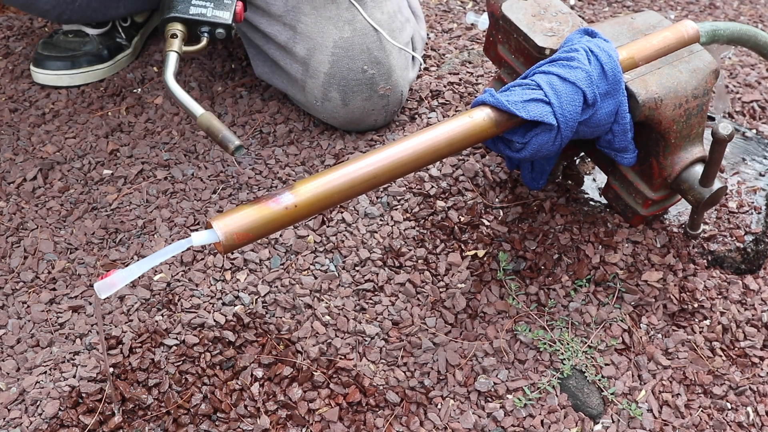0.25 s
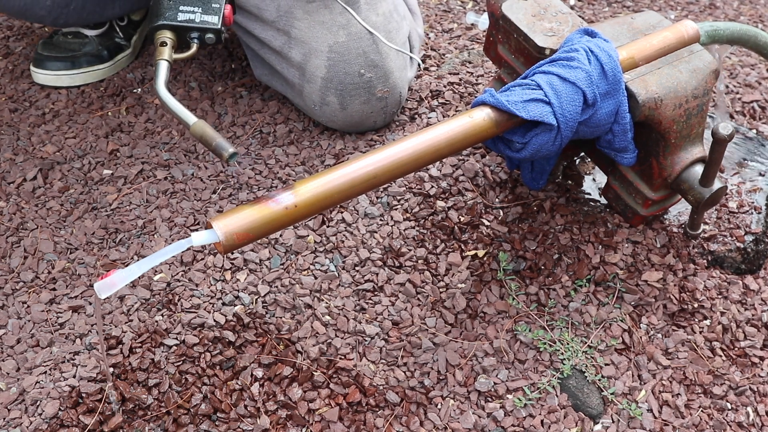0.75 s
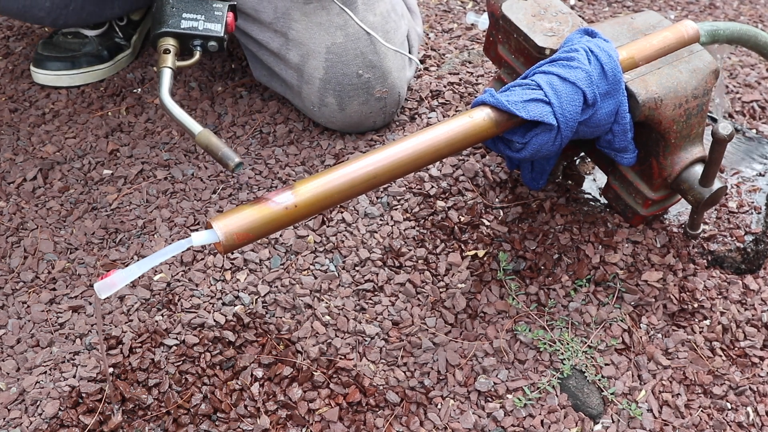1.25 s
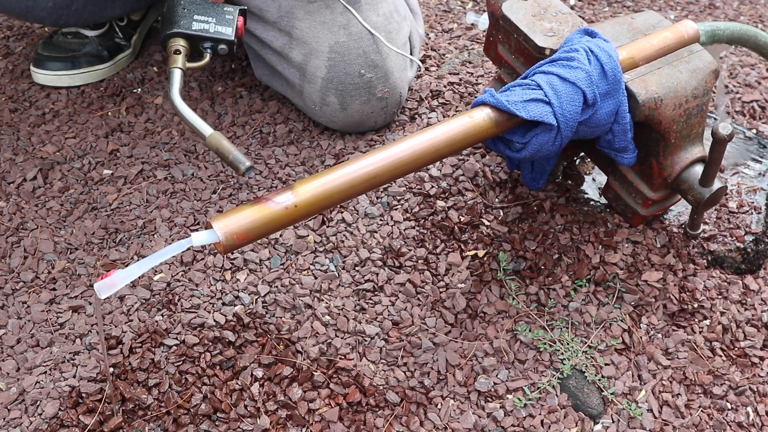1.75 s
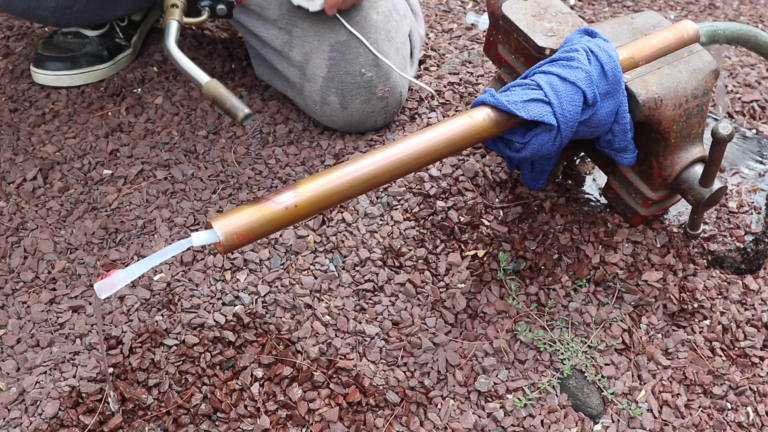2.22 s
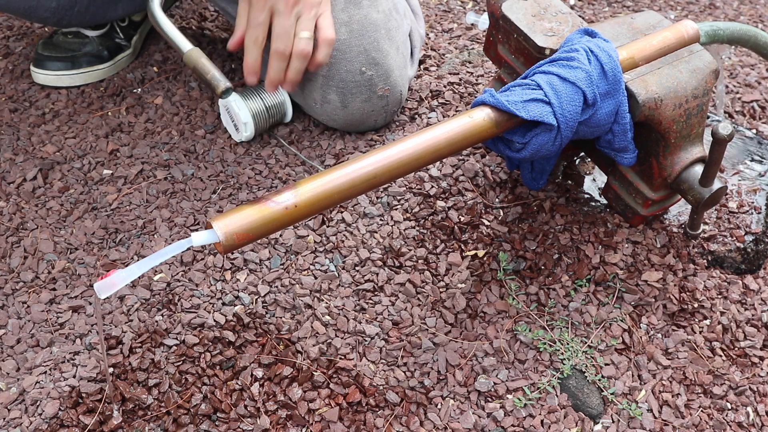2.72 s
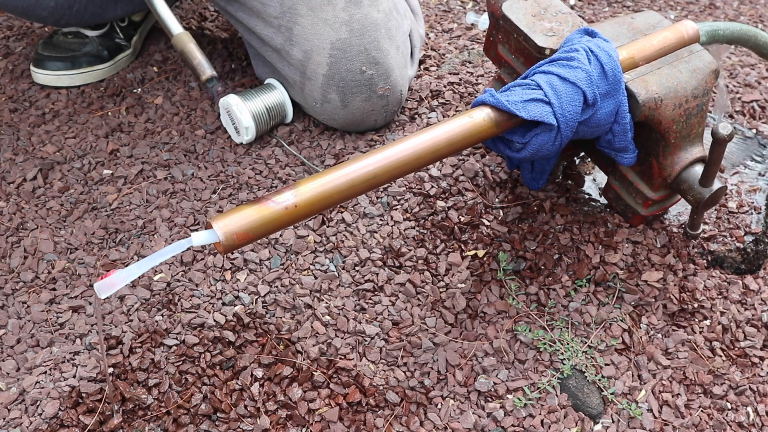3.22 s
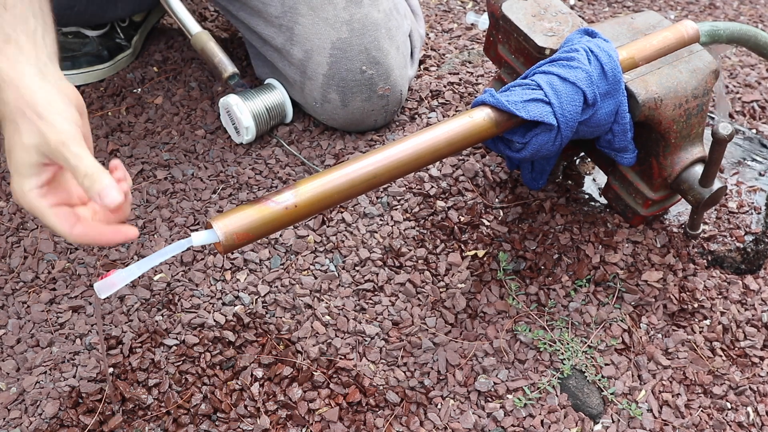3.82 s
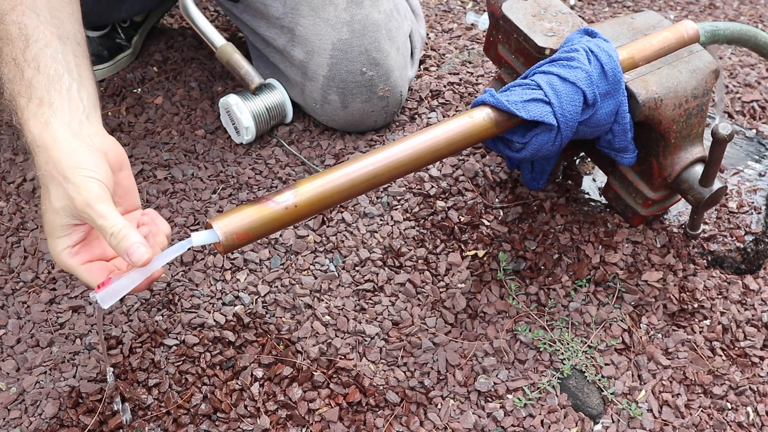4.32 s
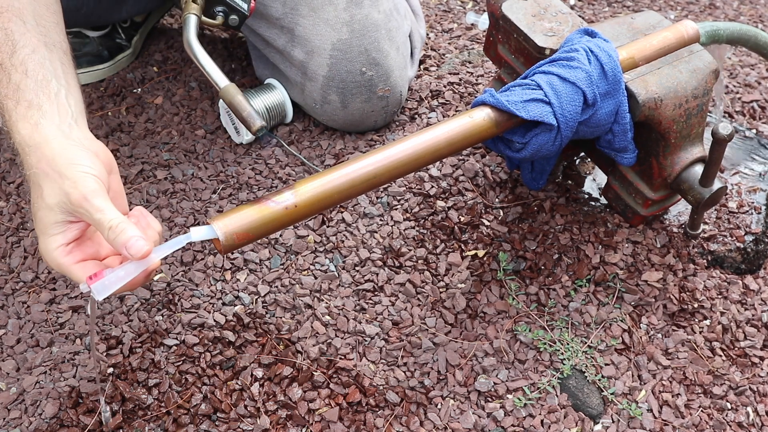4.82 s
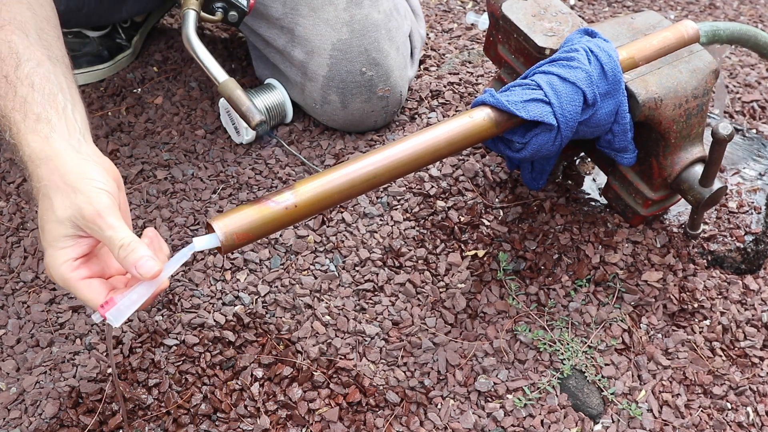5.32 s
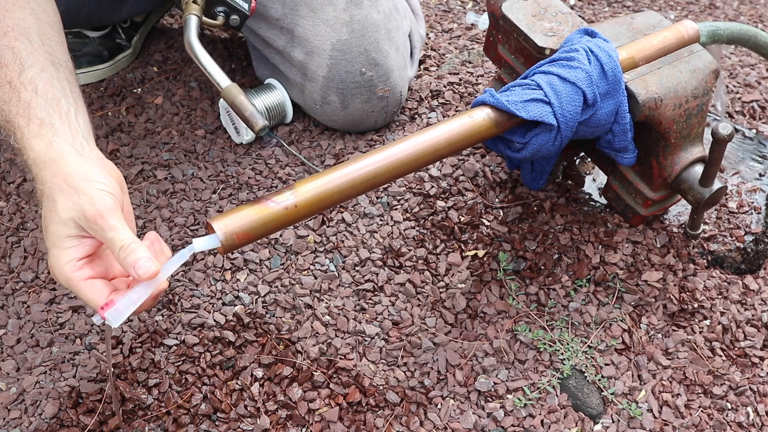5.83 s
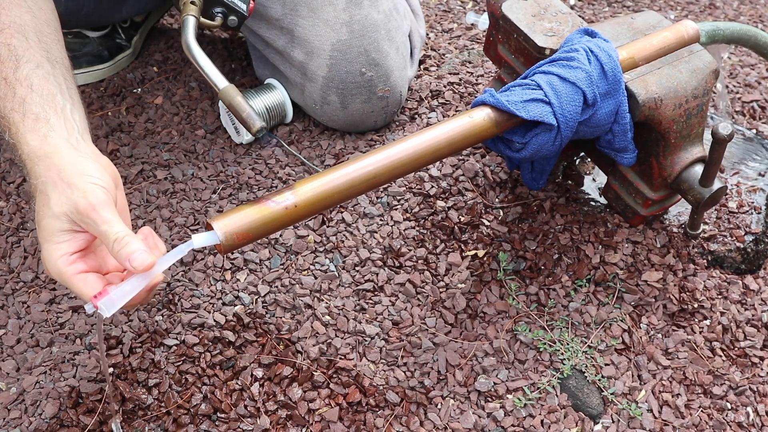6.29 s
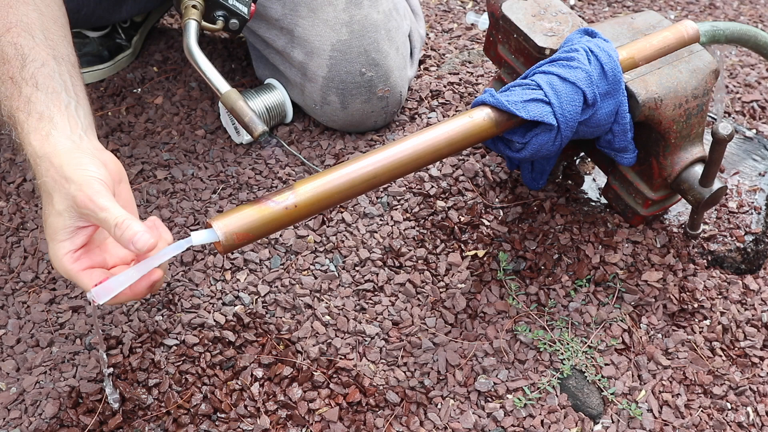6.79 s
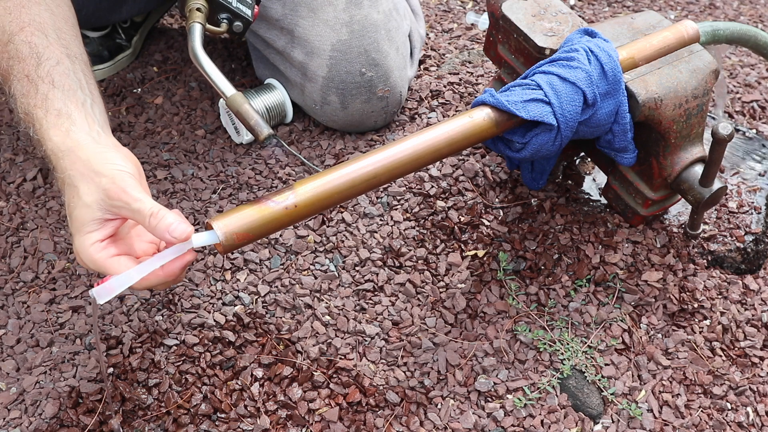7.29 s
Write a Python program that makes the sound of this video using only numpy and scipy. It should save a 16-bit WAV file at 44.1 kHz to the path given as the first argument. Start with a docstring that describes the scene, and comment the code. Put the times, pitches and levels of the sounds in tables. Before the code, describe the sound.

Heard from nearby in stereo, a blowtorch flame roars steadily over gravel while gas hisses from the nozzle, slightly to the left. Reflections from the ground give the noise a hollow, phasing colour that slides as the torch is moved. About a third of the way in, a solder spool makes a very faint double tick on the stones. A weak low hum comes and goes underneath, and the flame burns on.

```python
"""On gravel, two surfaces nearby. A hand-held gas torch burns close to the ground: the flame roars,
the gas jet hisses at the nozzle. The roar echoes off the ground and both surfaces, the hiss off the
ground; as the hand moves, the delays change and the comb of notches slides. A low hum wavers behind;
a solder spool ticks on the stones. Stereo, at two microphone ports."""
import sys
import numpy as np
from scipy import signal
from scipy.fft import rfft, irfft, next_fast_len
from scipy.io import wavfile
from scipy.ndimage import uniform_filter1d, map_coordinates

SR = 44100
rng = np.random.default_rng(int(sys.argv[2]) if len(sys.argv) > 2 else 0)


def inscribe(sig):
    """Save sig as 16-bit PCM at rate SR to the path in sys.argv[1].

    A 1-D sig is mono; a 2-D sig holds one channel per row.
    Samples are clipped to [-1, 1] before scaling.
    """
    pcm = np.round(np.clip(np.atleast_2d(sig).T, -1, 1) * 32767)
    wavfile.write(sys.argv[1], SR, pcm.astype(np.int16))


N = 332955
FRAME, HOP = 1024, 256
BIN_HZ = np.fft.rfftfreq(FRAME, 1 / SR)[:, None]
FRAME_S, SAMPLE_S = np.arange(N // HOP + 2) * HOP / SR, np.arange(N) / SR

# hum: (time [s], rms level [dB])
HUM_LEVEL = [(0.0, -35), (0.36, -54), (0.67, -34), (1.32, -47), (1.81, -41), (2.71, -63), (4.02, -39.5),
             (4.29, -55), (6.47, -39.5), (7.55, -55)]
# faint low noise: (frequency [Hz], density [dB])
LOW_NOISE_SPECTRUM = [(25, -20), (80, -12), (250, 0.5), (450, -4), (650, -46), (2200, -16), (2900, -50)]
# spool contacts: (time [s], onset level [dB])
SPOOL_TICKS = [(2.7721, -45), (2.7844, -46)]
# tick: (frequency [Hz], density [dB]); decay time
TICK_SPECTRUM, TICK_T60_S = [(5000, -40), (8000, -8), (13000, 0), (15000, -3)], .03

# echo delays: (time [s], flame via ground [ms], flame via far surface [ms], nozzle via ground [ms])
ECHO_DELAYS = [(0.0, 1.019, 1.747, 0.957), (0.3, 1.088, 1.739, 0.983), (0.6, 1.162, 1.854, 1.047),
               (0.8, 1.12, 1.799, 0.998), (1.05, 1.045, 1.742, 0.965), (1.55, 1.025, 1.726, 0.926),
               (1.8, 1.034, 1.728, 0.963), (2.0, 1.017, 1.702, 0.914), (2.2, 1.085, 1.776, 1.009),
               (2.4, 1.329, 1.839, 1.232), (2.6, 1.391, 1.873, 1.335), (2.95, 1.302, 1.951, 1.203),
               (3.15, 1.326, 1.955, 1.205), (3.35, 1.373, 1.989, 1.305), (3.55, 1.495, 2.042, 1.375),
               (3.8, 1.378, 2.085, 1.293), (4.15, 1.437, 2.083, 1.34), (4.5, 1.342, 2.045, 1.278),
               (4.75, 1.211, 1.968, 1.102), (4.9, 1.17, 1.973, 1.073), (5.4, 1.229, 1.978, 1.109),
               (5.8, 1.179, 1.942, 1.089), (6.5, 1.186, 1.947, 1.086), (7.0, 1.171, 1.94, 1.064),
               (7.55, 1.168, 1.896, 1.018)]
LOW_MS, HIGH_MS = 1.01, 1.41  # flame via ground, torch low and high

# jet hiss: (frequency [Hz], density [dB])
HISS_SPECTRUM = [(2300, -63), (2800, -17.5), (3250, -7.5), (3600, -5.5), (3850, -3.5), (4200, -3),
                 (5200, -1.5), (6000, -1), (7500, -7.5), (8500, -9.5), (9500, -13.5), (10500, -20.5),
                 (11500, -19.5), (13200, -20.5), (15000, -42)]
# burner tube resonances: (frequency [Hz], width [Hz], gain [dB])
TUBE_MODES = [(4470, 220, 2), (5180, 94, 4)]
# turning nozzle: (time [s], rms level [dB], ground echo at 5 kHz [ratio], beamed band gain [dB])
NOZZLE_AIM = [(0.0, -36, 0.57, 1), (0.45, -35.2, 0.35, 1.5), (0.6, -35.8, 0.35, 1.5), (0.8, -36, 0.4, 1),
              (1.05, -36.5, 0.6, 0.5), (1.55, -37.5, 0.47, -0.5), (1.8, -37, 0.5, -0.5),
              (2.0, -37, 0.5, -1), (2.2, -35, 0.36, 0.5), (2.4, -35, 0.36, 1), (2.6, -35.5, 0.35, 2),
              (2.95, -34.3, 0.3, 2), (3.15, -35, 0.23, 1.5), (3.35, -34.6, 0.27, 0.8),
              (3.55, -34.3, 0.28, 2.5), (3.8, -33.76, 0.4, 0), (4.15, -33.5, 0.5, -0.5), (4.5, -34, 0.4, 0),
              (4.75, -34, 0.4, -1.5), (4.9, -34, 0.34, -1.5), (5.4, -34.5, 0.38, -2.5),
              (5.8, -34, 0.3, -2.5), (6.5, -35, 0.3, -1.5), (7.0, -34, 0.3, 0), (7.55, -34, 0.33, -1.5)]
# hiss phase between ports: (frequency [Hz], left lead [rad])
PORT_LEAD = [(2900, .2), (3300, .9), (3550, 2.1), (3850, .6), (4300, .5), (4800, .15), (6000, .1),
             (7500, 1.1), (9500, 1.8), (10500, 2.6), (11500, 2.8), (12500, 1.9), (14000, 2.4)]
# torch fully aside: (frequency [Hz], extra left lead [rad])
ASIDE_LEAD = [(4200, 0.065), (5000, 0.66), (6000, 1), (7300, 0.17), (9000, 0.15)]
# hiss level between ports: (frequency [Hz], left minus right [dB])
PORT_BALANCE = [(3000, -29), (3550, 7.5), (3850, 0), (4300, 3.5), (5300, 3.5), (6000, 3), (9500, 2),
                (10500, 0.5), (12500, 4), (14000, -1)]
# scattered hiss: (frequency [Hz], base power share unlike between ports [0-1])
PORT_SCATTER = [(3000, 0.45), (3700, 0.23), (4300, 0.18), (5200, 0.04), (6600, 0.091), (7500, 0.21),
                (9500, 0.92), (11000, 0.24), (13000, 0.63)]
ASIDE_SHARE, TOP_HISS_DB = (1, .47, 0), (-1.5, 0, -.5)  # leftward offset, top treble: torch low, mid, high

# flame roar: (frequency [Hz], density [dB])
ROAR_SPECTRUM = [(20, -43), (42, -24.5), (75, -12), (180, -4), (345, -4.5), (560, 0.75), (700, 0),
                 (900, -2), (1100, -5.5), (1350, -4.5), (1600, -4), (2100, -6), (2600, -10.5), (3100, -20),
                 (3300, -25.5), (3900, -64)]
# roar colour, torch low to high: (frequency [Hz], change [dB])
ROAR_LIFT = [(400, 0), (680, -1.8), (980, .8), (1300, .5), (1650, 1.), (2100, 0)]
# turning flame, echoes at 1.5 kHz: (time [s], rms level [dB], ground [ratio], near [ratio], far [ratio])
FLAME_AIM = [(0.0, -18.82, 0.57, 0.26, 0.15), (0.3, -19.52, 0.47, 0.25, 0.21),
             (0.6, -18.11, 0.52, 0.26, 0.15), (0.8, -19.55, 0.48, 0.32, 0.28),
             (1.05, -19.47, 0.47, 0.28, 0.29), (1.55, -19.39, 0.5, 0.3, 0.35),
             (1.8, -19.98, 0.52, 0.39, 0.34), (2.0, -19.48, 0.56, 0.36, 0.31),
             (2.2, -18.46, 0.47, 0.28, 0.2), (2.4, -17.75, 0.56, 0.14, 0.08),
             (2.6, -18.41, 0.47, 0.1, 0.06), (2.95, -17.57, 0.43, 0.22, 0.14),
             (3.15, -17.52, 0.46, 0.2, 0.2), (3.35, -17.78, 0.39, 0.16, 0.12),
             (3.55, -17.58, 0.35, 0.14, 0.14), (3.8, -17.68, 0.39, 0.18, 0.22),
             (4.15, -17.85, 0.36, 0.16, 0.24), (4.5, -17.91, 0.43, 0.16, 0.15),
             (4.75, -16.7, 0.5, 0.23, 0.22), (4.9, -18.73, 0.49, 0.19, 0.23),
             (5.4, -17.94, 0.5, 0.19, 0.24), (5.8, -18.15, 0.48, 0.2, 0.25),
             (6.5, -18.52, 0.55, 0.19, 0.25), (7.0, -18.41, 0.53, 0.2, 0.21),
             (7.55, -18.72, 0.6, 0.24, 0.24)]


def amp(db):
    """dB to gain."""
    return 10 ** (np.asarray(db) / 20)


def unit(x):
    """Scale to rms 1."""
    return x / np.sqrt(np.mean(np.abs(x) ** 2) + 1e-20)


def at_hz(table, hz=BIN_HZ):
    """Interpolate on a log frequency axis."""
    knots_hz, values = np.transpose(table)
    return np.interp(np.log(hz + 1), np.log(knots_hz + 1), values)


def at_time(table, time_s):
    """Interpolate each value column in time."""
    knots_s, *columns = np.transpose(table)
    return [np.interp(time_s, knots_s, column) for column in columns]


def at_height(low_to_high, ground_ms):
    """Interpolate over torch height, given as ground echo delay."""
    return np.interp(ground_ms, np.linspace(LOW_MS, HIGH_MS, len(low_to_high)), low_to_high)


def wobble(rate_hz):
    """Smooth random curve, knots at rate_hz."""
    knots = rng.standard_normal(int(N * rate_hz / SR) + 4)
    return map_coordinates(knots, [SAMPLE_S * rate_hz])


def filtered(x, response):
    """Apply the gain response(hz)."""
    size = next_fast_len(N + 8192)
    return irfft(rfft(x, size) * response(np.fft.rfftfreq(size, 1 / SR)), size)[..., :N]


def stereo_noise(spectrum):
    """Coloured noise, independent per port, rms 1."""
    return unit(filtered(rng.standard_normal((2, N)), lambda hz: amp(at_hz(spectrum, hz))))


def turbulence(flutter_db, patch_db):
    """STFT of noise that flutters as a whole and in time-frequency patches."""
    flutter = wobble(7) + .61 * wobble(22) + .99 * wobble(60)
    noise = rng.standard_normal(N) * amp(flutter_db * flutter)
    stft = signal.stft(noise, nperseg=FRAME, noverlap=FRAME - HOP)[2]
    patches = uniform_filter1d(rng.standard_normal(stft.shape), size=12, axis=0)
    patches = uniform_filter1d(patches, size=8, axis=1)
    return stft * amp(patch_db * unit(patches))


def to_samples(stft):
    """Inverse STFT, rms 1."""
    return unit(signal.istft(stft, nperseg=FRAME, noverlap=FRAME - HOP)[1][..., :N])


def echo(delay_ms, gain, db_per_khz, phase_rad=0., ref_hz=1500):
    """One reflection: delayed, tilted about ref_hz, phase turned by the surface."""
    tilt_db = db_per_khz * (np.minimum(BIN_HZ, 12000) - ref_hz) / 1000
    lag_rad = 2 * np.pi * BIN_HZ * delay_ms / 1000
    return np.minimum(gain * amp(tilt_db), .9) * np.exp(1j * (phase_rad - lag_rad))


def background(hum_hz=86.2, waver_hz=1.35, low_noise_db=-66):
    """Wavering centred hum over faint low noise, independent in left and right."""
    phase_rad = 2 * np.pi * np.cumsum(hum_hz + waver_hz * wobble(7.5)) / SR
    hum = amp(at_time(HUM_LEVEL, SAMPLE_S)[0]) * np.sqrt(2) * np.sin(phase_rad)
    return hum + amp(low_noise_db) * stereo_noise(LOW_NOISE_SPECTRUM)


def spool():
    """Plastic spool touches stone: a faint, bright double tick."""
    noise = stereo_noise(TICK_SPECTRUM)
    ticks = np.zeros((2, N))
    for onset_s, level_db in SPOOL_TICKS:
        age_s = SAMPLE_S - onset_s
        ticks += amp(level_db - 60 * np.abs(age_s) / TICK_T60_S) * (age_s >= 0) * noise
    return ticks


def jet(beam_hz=5800, beam_octaves=.26):
    """Turbulent gas hisses at the nozzle; the microphone body scatters it and favours the left port."""
    direct, *scattered = (turbulence(flutter_db=.45, patch_db=.6) for _ in range(3))
    height_ms, _, ground_ms = at_time(ECHO_DELAYS, FRAME_S)
    _, ground_gain, aim_db = at_time(NOZZLE_AIM, FRAME_S)
    side = np.array([1, -1])[:, None, None]  # left, right

    aside_rad = at_height(ASIDE_SHARE, height_ms) * at_hz(ASIDE_LEAD)
    port_phase = np.exp(.5j * side * (at_hz(PORT_LEAD) + aside_rad))
    scatter = np.clip(at_hz(PORT_SCATTER) + .23 * aside_rad, 0, 1)
    hiss = np.sqrt(1 - scatter) * direct * port_phase + np.sqrt(scatter) * np.array(scattered)

    ground_ms = ground_ms - .005 * side
    downward = np.clip((BIN_HZ - 3650) / 550, .15, 1)  # narrow jet throws mainly treble down
    ground = echo(ground_ms, ground_gain * downward, db_per_khz=-1.7, ref_hz=5000)
    trailing = echo(ground_ms + .09, .05, db_per_khz=0)  # uneven gravel spreads the echo

    tube_db = sum(db / (1 + (2 * (BIN_HZ - hz) / width_hz) ** 2) for hz, width_hz, db in TUBE_MODES)
    beam_db = aim_db * np.exp(-(np.log2((BIN_HZ + 1) / beam_hz) / beam_octaves) ** 2)
    top_db = at_height(TOP_HISS_DB, height_ms) * np.clip((BIN_HZ - 10000) / 2000, 0, 1)
    colour_db = at_hz(HISS_SPECTRUM) + tube_db + beam_db + top_db + side * at_hz(PORT_BALANCE) / 2
    level_db = at_time(NOZZLE_AIM, SAMPLE_S)[0]
    return amp(level_db) * to_samples(hiss * (1 + ground + trailing) * amp(colour_db))


def flame(near_lag_ms=.205):
    """Turbulent roar, alike at both ports, combed by three echoes; small surfaces favour short waves."""
    roar = turbulence(flutter_db=.35, patch_db=.3)
    ground_ms, far_ms, _ = at_time(ECHO_DELAYS, FRAME_S)
    _, ground_gain, near_gain, far_gain = at_time(FLAME_AIM, FRAME_S)

    porous_rad = .7 + .344 * np.log2((BIN_HZ + 1) / 1000)  # porous gravel turns treble phase more
    ground = echo(ground_ms, ground_gain, db_per_khz=-1., phase_rad=porous_rad)
    near = echo(ground_ms + near_lag_ms, near_gain, db_per_khz=4.6, phase_rad=1.02)
    far = echo(far_ms, far_gain, db_per_khz=1.47, phase_rad=1.17)

    colour_db = at_hz(ROAR_SPECTRUM) + at_height((-.5, .5), ground_ms) * at_hz(ROAR_LIFT)
    level_db = at_time(FLAME_AIM, SAMPLE_S)[0]
    return amp(level_db) * to_samples(roar * (1 + ground + near + far) * amp(colour_db))


def scene():
    """Sum at the two ports."""
    return flame() + jet() + background() + spool()


def record(dry, cutoff_hz=15050):
    """Brick-wall low-pass."""
    return filtered(dry, lambda hz: hz < cutoff_hz)


dry = scene()
out = record(dry)
inscribe(out)
```